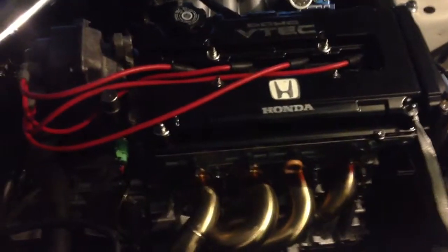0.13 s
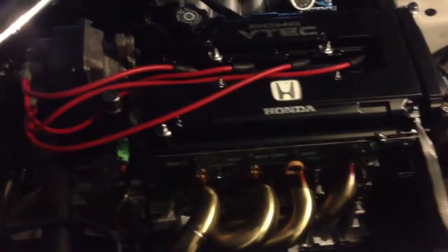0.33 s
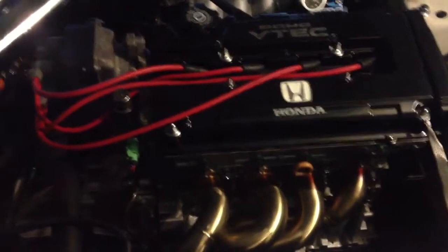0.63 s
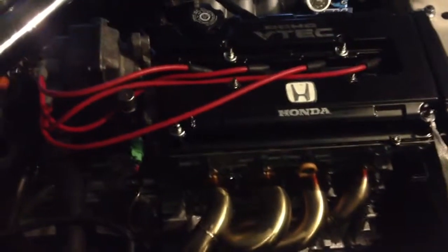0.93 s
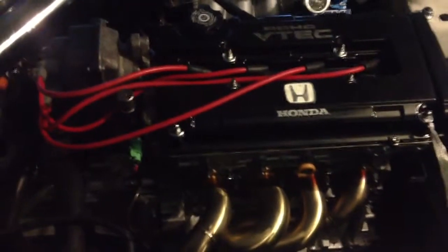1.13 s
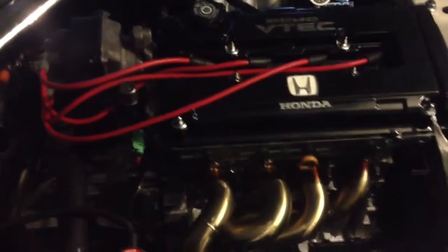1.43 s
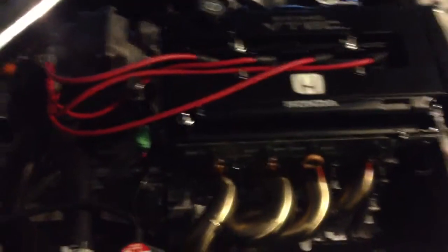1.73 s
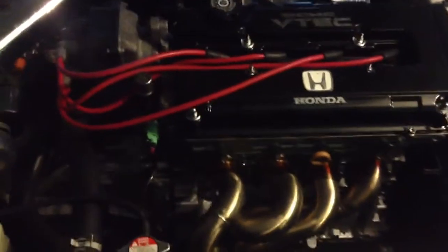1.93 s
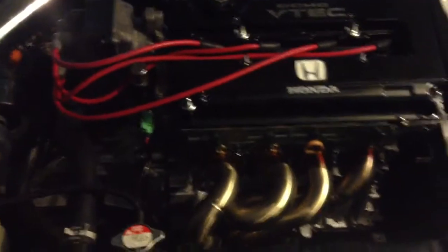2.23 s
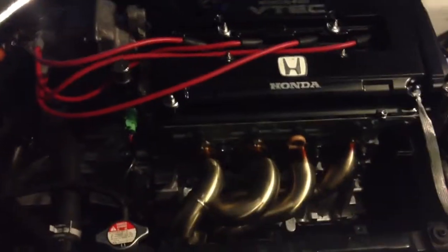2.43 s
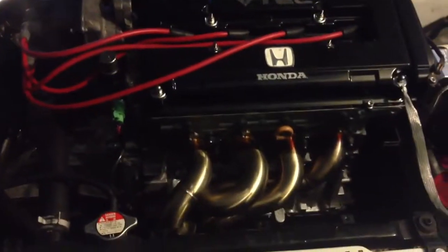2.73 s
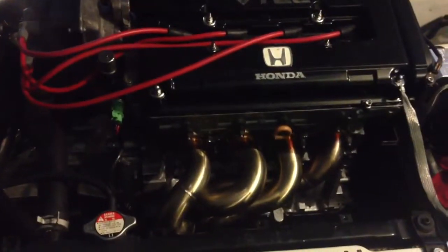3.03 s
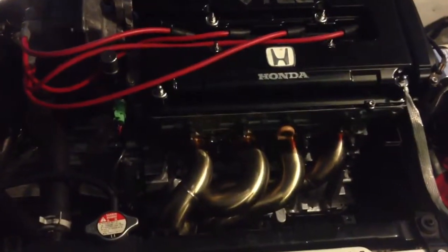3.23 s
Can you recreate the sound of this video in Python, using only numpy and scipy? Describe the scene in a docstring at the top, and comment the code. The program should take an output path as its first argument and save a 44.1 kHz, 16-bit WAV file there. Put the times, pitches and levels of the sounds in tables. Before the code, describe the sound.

Idling petrol engine knocks metallically about seven times a second over droning exhaust and hiss.

```python
"""Idling four-cylinder petrol engine

At about 890 rpm, something knocks metallically once per cycle, with a bright rebound, after an exhaust boom.
Knocks and ticks are decaying noise and ringing modes; booms are short gliding tones.
Firing pulses ring resonances of the pipes and the bay, and two wavering pipe notes throb unevenly.
The valve train ticks, clacks and clatters over a grainy noise hiss; a loose part chatters twice."""
import sys
import numpy as np
from scipy import signal
from scipy.fft import rfft, irfft
from scipy.io import wavfile
from scipy.ndimage import uniform_filter1d

SR = 44100
rng = np.random.default_rng(int(sys.argv[2]) if len(sys.argv) > 2 else 0)


def store_wav(level_fs):
    """Save 16-bit WAV to argv[1]."""
    pcm = np.round(np.clip(np.atleast_2d(level_fs), -1, 1) * 32767)
    wavfile.write(sys.argv[1], SR, pcm.T.astype(np.int16))


N = 148617
TIME = np.arange(N) / SR


def from_db(db):
    """Decibels to amplitude gain."""
    return 10 ** (np.asarray(db) / 20)


def rms_one(x):
    """Scale to unit rms."""
    return x / np.sqrt(np.mean(x ** 2) + 1e-20)


def coloured(spectrum):
    """Noise of rms 1, its spectrum interpolated over log frequency."""
    hz, db = np.transpose(spectrum)
    bins_hz = np.arange(N // 2 + 1) * SR / N + 1  # +1 avoids log(0)
    gain = from_db(np.interp(np.log(bins_hz), np.log(hz), db))
    return rms_one(irfft(rfft(rng.standard_normal(N)) * gain, N))


def drift(rate_hz):
    """Smooth random wander, rms 1."""
    steps = np.interp(TIME * rate_hz, np.arange(600), rng.standard_normal(600))
    return rms_one(uniform_filter1d(steps, int(SR / rate_hz / 2)))


def clicks(s, db):
    """One single-sample click for each time and level."""
    out = np.zeros(N)
    inside = (s >= 0) & (s < (N - 1) / SR)
    np.add.at(out, (s[inside] * SR).astype(int), from_db(db)[inside])
    return out


def dying(hits, t60_s):
    """Envelope that jumps at each click and decays exponentially."""
    return signal.lfilter([1], [1, -from_db(-60 / (t60_s * SR))], hits + 1e-18)


def struck(s, db, modes, spread_db):
    """Blows ring two-pole modes, each blow and mode with a random strength."""
    out = 0
    for k, (hz, level_db, t60_s) in enumerate(modes):
        r = np.exp(-np.log(1000) / (t60_s * SR))
        w = 2 * np.pi * hz / SR
        hits = clicks(s, db + level_db + spread_db * rng.standard_normal(len(s)))
        ring = signal.lfilter([0, np.sin(w)], [1, -2 * r * np.cos(w), r * r], hits + 1e-18)
        out = out + (-1) ** k * ring
    return out


def resonate(x, resonances):
    """Parallel resonances, each applied twice for deep valleys; output rms 1."""
    out = 0
    primed = np.r_[x[-SR // 2:], x]  # the filters are already ringing at the start
    for hz, width_hz, db in resonances:
        r = np.exp(-np.pi * width_hz * np.sqrt(2) / SR)
        section = [(1 - r * r) / 2, 0, (r * r - 1) / 2, 1, -2 * r * np.cos(2 * np.pi * hz / SR), r * r]
        out = out + from_db(db) * signal.sosfilt([section, section], primed)[-N:]
    return rms_one(out)


def evened(x, window_s):
    """Divide out swings of level slower than the window."""
    return x / np.sqrt(uniform_filter1d(x * x, int(window_s * SR)) + 1e-6)


def swells(rows):
    """Gaussian rise and fall per row (s, dB, .., half length s), added in power."""
    return np.sqrt(sum(from_db(db) ** 2 * np.exp(-((TIME - s) / half_s) ** 2) for s, db, *_, half_s in rows))


def tone(hz):
    """Sine pipe note of rms 1 with a randomly wavering pitch."""
    wavering_hz = hz + PIPE_WANDER_HZ * drift(24.95)
    return np.sqrt(2) * np.sin(2 * np.pi * np.cumsum(wavering_hz) / SR)


SAME_RING_SHARE = 0.3  # of power


def metal_ring(hits, spectrum, t60_s):
    """Dense ring of a casting as decaying noise: partly the same at every blow, partly new."""
    one_ring = (coloured(spectrum) * np.exp(-np.log(1000) * TIME / t60_s))[:SR // 4]
    same = signal.fftconvolve(hits, one_ring)[:N]
    new = dying(hits, t60_s) * coloured(spectrum)
    return np.sqrt(SAME_RING_SHARE) * same + np.sqrt(1 - SAME_RING_SHARE) * new


# Engine cycles, two crank turns each; levels precede the part gains.
# Each row: knock time in seconds, knock level in dB, rebound level in dB, exhaust boom level in dB.
CYCLES = [(0.0,-22.5,-30,-32),(.135,-29,-42,-12.5),(.269,-23,-38,-12),(.405,-24,-36.5,-14.5),(.535,-21.5,-53,-17.5),(.668,-48,-49,-13),(.798,-20,-43,-14),
          (.935,-21.5,-42,-30),(1.067,-21,-41,-15.5),(1.204,-22.5,-30.5,-13),(1.343,-24,-30,-13),(1.478,-20,-49,-20.5),(1.616,-27.5,-29,-12.5),
          (1.756,-28,-35.5,-11.5),(1.891,-20.5,-33.5,-14.5),(2.028,-26.5,-28.5,-12.5),(2.163,-20,-48,-20.5),(2.299,-22,-38,-17.5),(2.435,-54,-53,-20),(2.567,-23.5,-37,-14),
          (2.7,-19.5,-38,-14),(2.836,-34,-42,-28),(2.97,-34,-30.5,-14),(3.11,-46,-39,-11.5),(3.248,-23,-31.5,-25),(3.38,-35,-43,-13)]


def cycle_count():
    """Engine cycles completed at each moment, interpolated between knocks."""
    return np.interp(TIME, np.array(CYCLES)[:, 0], np.arange(len(CYCLES)))


# Cylinders in firing order, relative levels.
# Each row: exhaust pulse in dB, valve tick in dB, clatter in dB.
CYLINDERS = [(5, 11, 5), (3, 6.5, -30), (1, 5, -10), (7.5, -14, 5)]


def firings(lag_s, column, spread_db):
    """Four evenly spaced clicks per engine cycle, each cylinder with its own strength."""
    knock_s = np.array(CYCLES)[:, 0]
    n = np.arange(4 * (len(knock_s) - 1))
    s = np.interp(n / len(CYLINDERS), np.arange(len(knock_s)), knock_s) + lag_s
    db = np.array(CYLINDERS)[n % len(CYLINDERS), column]
    return clicks(s, db + spread_db * rng.standard_normal(len(n)))


# Hiss spectrum. Each row: frequency in Hz, relative density in dB per Hz.
HISS_SPECTRUM = [(20, -14), (60, -29), (95, 1), (150, 15.5), (260, -22), (400, -17), (540, 1.5),
                 (950, -1.5), (1380, 4.5), (1750, -0.5), (2300, -1.5), (2750, -7.5), (3600, -7.5),
                 (4500, -11), (4770, -5.5), (5100, -12), (5700, -12), (6700, -7), (7600, -9.5),
                 (8400, -6.5), (9000, -12.5), (9900, -16.5), (10700, -12.5), (11400, -13.5), (11700, -11.5),
                 (12200, -22), (12700, -13), (13900, -18.5), (15200, -20.5)]
HISS_DB, HISS_GRAIN_DB, HISS_GRAIN_HZ = -26, 0.88, 110


def hiss():
    """Steady noise rush of belts, gears and intake air, its level slightly grainy."""
    return from_db(HISS_DB + HISS_GRAIN_DB * drift(HISS_GRAIN_HZ)) * coloured(HISS_SPECTRUM)


# Chatter of small loose parts. Each row: start in seconds, frequency in Hz, level in dB.
PINGS = [(0.623, 3324, -29), (0.746, 2420, -38)]
PING_GAP_S, PING_GROWTH_DB, PING_T60_S, PING_SPREAD_DB = .007, 0.5, 0.082, 5.5


def pings():
    """A loose part chatters: three quick touches ring it on one note."""
    out = 0
    touch = np.arange(3)
    for s, hz, db in PINGS:
        touch_s = s + PING_GAP_S * (touch + 0.28 * rng.random(len(touch)))
        touch_db = db + PING_GROWTH_DB * touch
        out = out + struck(touch_s, touch_db, [(hz, 0, PING_T60_S)], PING_SPREAD_DB)
    return out


# Louder valve clacks. Each row: start in seconds, level in dB before CLACK_DB.
CLACKS = [(0.214, -16), (0.349, -19), (0.613, -18), (0.7477, -19), (1.1535, -20.5), (1.5609, -19),
          (1.6975, -23), (1.9746, -20.5), (2.513, -19.5), (2.531, -26), (2.648, -22.5), (3.0585, -25)]
# Valve and piston spectra. Each row: frequency in Hz, relative density in dB per Hz.
TICK_SPECTRUM = [(200, -45), (1200, -25), (2500, 5), (4000, 5.5), (5400, -17), (6400, -2.5), (8300, 9),
                 (9600, -6), (11500, -4), (15000, -2)]
CLACK_SPECTRUM = [(200, -44), (1200, -3), (2600, 5), (4000, -14), (5200, -8), (6400, 2), (8200, -3.5),
                  (9600, -7), (11500, -25), (15000, -17)]
CLATTER_SPECTRUM = [(80, -35), (300, -7), (600, 14), (950, 14), (1380, -3), (1750, 2), (2200, -5),
                    (2800, -5), (4000, -22), (8000, -9)]
TICK_DB, TICK_LAG_S, TICK_RISE_S, TICK_T60_S, TICK_SPREAD_DB = -38.5, 0.033, 0.0053, 0.11, 2.5
CLACK_DB, CLACK_T60_S = -6, .15
CLATTER_DB, CLATTER_LAG_S, CLATTER_T60_S, CLATTER_SPREAD_DB = -43, 0.005, 0.19, 2.0


def valve_train():
    """Valves tick and pistons clatter at the firing rate as decaying noise; some valve clacks are louder."""
    tick_hits = firings(TICK_LAG_S, column=1, spread_db=TICK_SPREAD_DB)
    tick_envelope = uniform_filter1d(dying(tick_hits, TICK_T60_S), int(TICK_RISE_S * SR) + 1)
    ticks = from_db(TICK_DB) * rms_one(tick_envelope) * coloured(TICK_SPECTRUM)
    s, db = np.transpose(CLACKS)
    clacks = dying(clicks(s, db + CLACK_DB), CLACK_T60_S) * coloured(CLACK_SPECTRUM)
    clatter_hits = firings(CLATTER_LAG_S, column=2, spread_db=CLATTER_SPREAD_DB)
    clatter_envelope = rms_one(dying(clatter_hits, CLATTER_T60_S))
    clatter = from_db(CLATTER_DB) * clatter_envelope * coloured(CLATTER_SPECTRUM)
    return ticks + clacks + clatter


# Resonances of pipes and bay. Each row: frequency in Hz, width in Hz, relative level in dB.
LOW_PIPE = [(169, 17.3, 3.5), (200.9, 18.4, 2.5), (233.3, 12.8, -2.5)]
UPPER_PIPE = [(300.1, 14.7, 0), (336.4, 22.5, 0), (359.7, 9.5, 0)]
BAY = [(434.6, 19.4, 0), (465.6, 15.6, 0)]
# Throbs of the lower pipe note.
# Each row: centre in seconds, level in dB before LOW_DB, pitch in Hz, half length in seconds.
LOW_THROBS = [(0.02,-13,199.7,0.023),(0.13,-12.5,198.7,0.034),(0.313,-16,193.2,0.037),(0.431,-13,189.7,0.017),(0.489,-11,201.2,0.013),(0.581,-10,194.7,0.029),(0.708,-12,193.4,0.029),
              (0.828,-16.5,186.9,0.028),(0.891,-14.5,201,0.019),(0.961,-15,191.4,0.019),(1.099,-18.5,192.5,0.013),(1.238,-19,188.8,0.015),(1.359,-14.5,197.8,0.031),(1.467,-13.5,200,0.035),
              (1.551,-17.5,186.6,0.032),(1.647,-15.5,198,0.019),(1.79,-16,199.7,0.037),(1.872,-13.5,200,0.023),(1.946,-18,187,0.017),(2.06,-14.5,197.3,.013),(2.169,-13.5,197,0.037),
              (2.316,-16,196.7,.02),(2.423,-12,199,0.043),(2.608,-17.5,191.5,0.029),(2.729,-14.5,189,.012),(2.825,-15.5,199,0.043),(2.985,-16,197.3,0.03),(3.136,-14.5,201,0.031),(3.267,-12,200,0.031)]
# Throbs of the upper pipe note.
# Each row: centre in seconds, level in dB before UPPER_DB, half length in seconds.
UPPER_THROBS = [(.07,-19,0.071),(.28,-20,0.022),(.525,-17.5,0.056),(.87,-23.5,0.057),(1.09,-21,0.03),(1.235,-21.5,0.026),(1.4,-18,0.059),(1.61,-21.5,0.046),(1.78,-16.5,0.031),(1.91,-19.5,0.023),
                (2.05,-18,.022),(2.18,-18,.03),(2.31,-20.5,0.05),(2.42,-16.5,.035),(2.585,-18,0.023),(2.78,-19,.045),(2.98,-16.5,0.038),(3.13,-17,.028),(3.27,-22,0.032)]
FIRING_LAG_S, PUFF_T60_S, PUFF_SHARE = .016, 0.026, 0.243
UPPER_HZ, UPPER_BEND_HZ, PIPE_WANDER_HZ, UPPER_ROUGH = 325.1, 14, 5, 0.32
LOW_DB, UPPER_DB, LOW_BED_DB, UPPER_BED_DB, BAY_DB = -3, -3, -25, -29.5, -33.5


def drone():
    """Firing pulses ring pipes and bay; two pipe notes throb, the upper bending up after each knock."""
    pulses = firings(FIRING_LAG_S, column=0, spread_db=0.5)
    gas = pulses + PUFF_SHARE * dying(pulses, PUFF_T60_S) * rng.standard_normal(N)
    low_bed, upper_bed, bay = (evened(resonate(gas, body), window_s=0.076)
                               for body in (LOW_PIPE, UPPER_PIPE, BAY))
    s, _, hz, _ = np.transpose(LOW_THROBS)
    low = swells(LOW_THROBS) * tone(np.interp(TIME, s, hz))
    upper_note = tone(UPPER_HZ - UPPER_BEND_HZ * np.cos(2 * np.pi * cycle_count()))
    upper = swells(UPPER_THROBS) * evened(upper_note + UPPER_ROUGH * upper_bed, window_s=0.033)
    notes = from_db(LOW_DB) * low + from_db(UPPER_DB) * upper
    beds = from_db(LOW_BED_DB) * low_bed + from_db(UPPER_BED_DB) * upper_bed
    return notes + beds + from_db(BAY_DB) * bay


BOOM_HZ, BOOM_GLIDE_HZ_PER_S, BOOM_DB = 128.1, 35, -1
BOOM_LEAD_S, BOOM_WIDTH_S, BOOM_PHASE_SPREAD_TURNS = 0.0157, 0.024, 0.16


def boom():
    """The exhaust booms: a Gaussian burst of rising tone peaks just before each knock."""
    out = 0
    for s, _, _, db in CYCLES:
        t = TIME - s + BOOM_LEAD_S
        phase_turns = BOOM_PHASE_SPREAD_TURNS * rng.standard_normal()
        turns = BOOM_HZ * t + BOOM_GLIDE_HZ_PER_S * t * t / 2 + phase_turns
        envelope = from_db(db + BOOM_DB) * np.exp(-.5 * (t / BOOM_WIDTH_S) ** 2)
        out = out + envelope * np.cos(2 * np.pi * turns)
    return out


# Modes of the block, and modes that the rebound wakes.
# Each row: frequency in Hz, relative level in dB, t60 in seconds.
BLOCK_MODES = [(1536,8.5,0.18)]
BRIGHT_MODES = [(3710,8,.1)]
# Knock and rebound spectra. Each row: frequency in Hz, relative density in dB per Hz.
KNOCK_SPECTRUM = [(60, -55), (300, -43), (700, -2.5), (1100, -3), (1500, 8.5), (1750, 0), (2200, 5.5),
                  (2700, -4.5), (3300, -13), (5000, -13.5), (9000, -53)]
REBOUND_SPECTRUM = [(100, -55), (500, -8), (1200, 3.5), (2200, 1.5), (3000, 1), (3350, -1.5), (3900, 3.5),
                    (4400, -11.5), (4850, -3), (5600, -13), (12000, -17.5)]
KNOCK_DB, KNOCK_RING_DB, KNOCK_T60_S = -3.5, -12.5, .09
SECOND_TOUCH_S, SECOND_TOUCH_DB = .004, 3.5  # delay before its random scatter
CRACK_DB, CRACK_GROWTH, CRACK_T60_S = 10, 1.5, .022  # growth: crack dB per rebound dB
REBOUND_DB, REBOUND_RING_DB, REBOUND_T60_S = 8, -25, 0.099
REBOUND_S, RATTLE_S = .0075, .015
FIRST_TOUCH_DB, REBOUND_TOUCH_DB, RATTLE_DB = -1.5, -4.5, -6


def knocks():
    """Two touches ring the block; a sharp crack and bright rebound follow the rebound level."""
    s, db, rebound_db, _ = np.transpose(CYCLES)
    second_s = s + SECOND_TOUCH_S * rng.uniform(0.813, 1.21, len(s))
    blow_hits = clicks(s, db + KNOCK_DB) + clicks(second_s, db + KNOCK_DB + SECOND_TOUCH_DB)
    blow = metal_ring(blow_hits, KNOCK_SPECTRUM, KNOCK_T60_S)
    block = struck(second_s, db + KNOCK_RING_DB, BLOCK_MODES, spread_db=1.5)
    bright = struck(s + REBOUND_S, rebound_db + REBOUND_RING_DB, BRIGHT_MODES, spread_db=7.0)

    mean_db = np.mean(rebound_db)
    crack_db = mean_db + CRACK_GROWTH * (rebound_db - mean_db) + CRACK_DB
    crack = dying(clicks(s, crack_db), CRACK_T60_S) * coloured(KNOCK_SPECTRUM)

    touches = (clicks(s, rebound_db + FIRST_TOUCH_DB)
               + clicks(s + REBOUND_S, rebound_db + REBOUND_TOUCH_DB)
               + clicks(s + RATTLE_S, rebound_db + RATTLE_DB))
    rebound = from_db(REBOUND_DB) * metal_ring(touches, REBOUND_SPECTRUM, REBOUND_T60_S)
    return blow + block + bright + crack + rebound


def scene():
    """All parts of the engine summed to one channel."""
    return (hiss() + pings() + valve_train() + drone() + boom() + knocks())[None]


CUTOFF_HZ = 15350


def record(dry):
    """Steep elliptic low-pass cuts the top."""
    low_pass = signal.ellip(12, .1, 90, CUTOFF_HZ, fs=SR, output="sos")  # ripple dB, stopband dB
    return signal.sosfilt(low_pass, dry)


dry = scene()
out = record(dry)
store_wav(out)
```